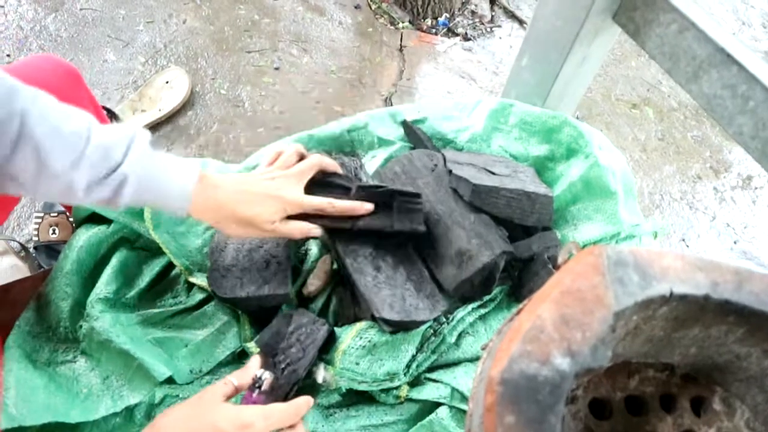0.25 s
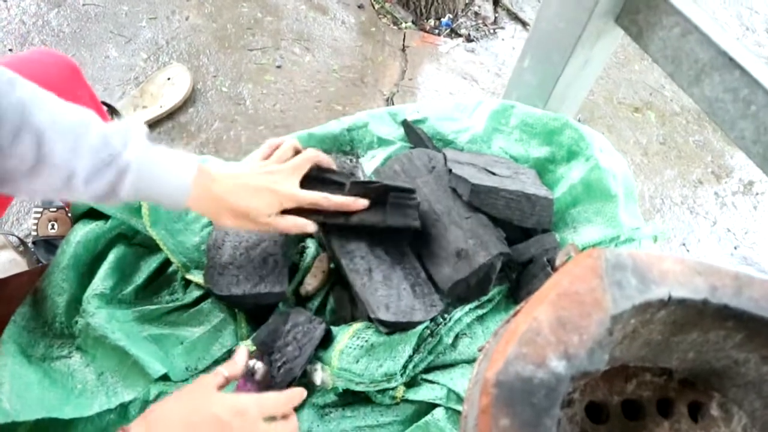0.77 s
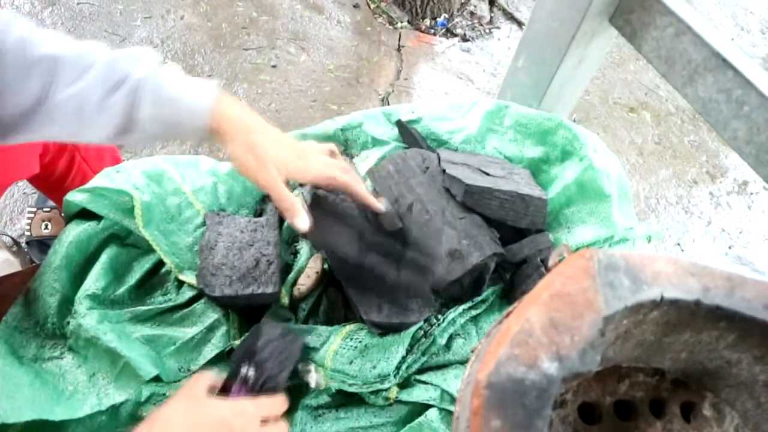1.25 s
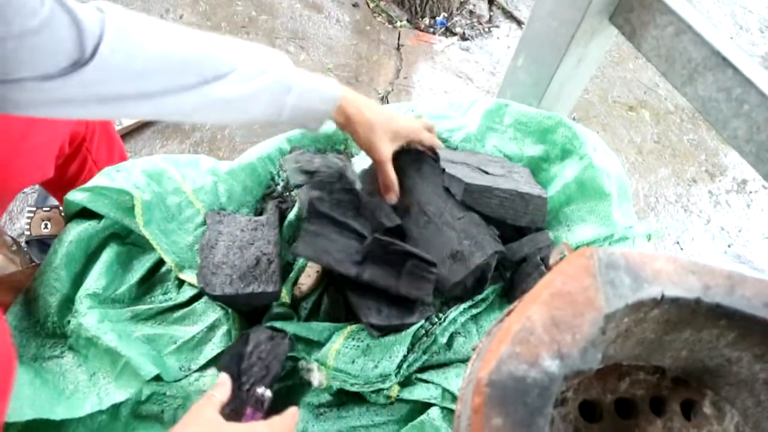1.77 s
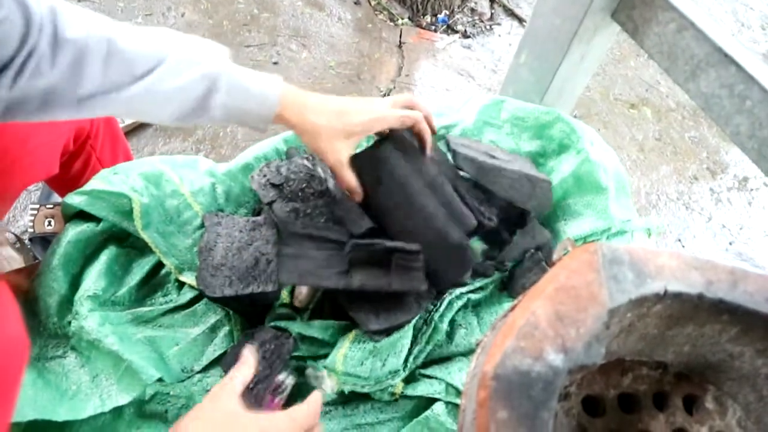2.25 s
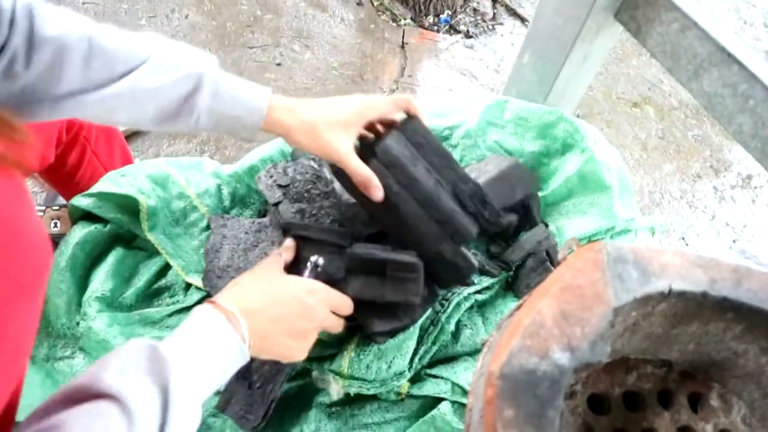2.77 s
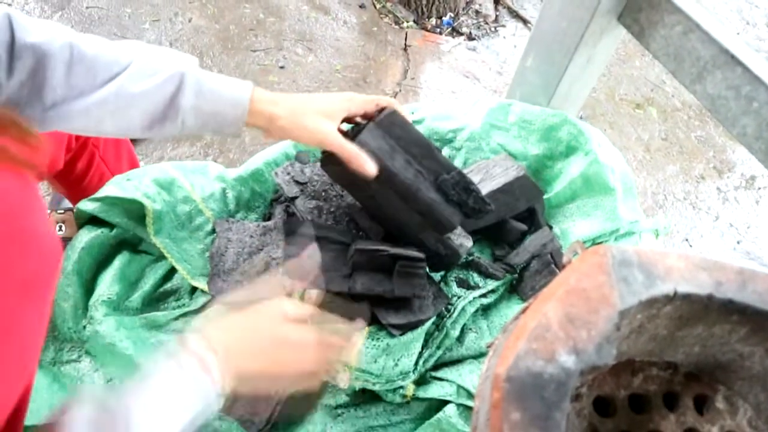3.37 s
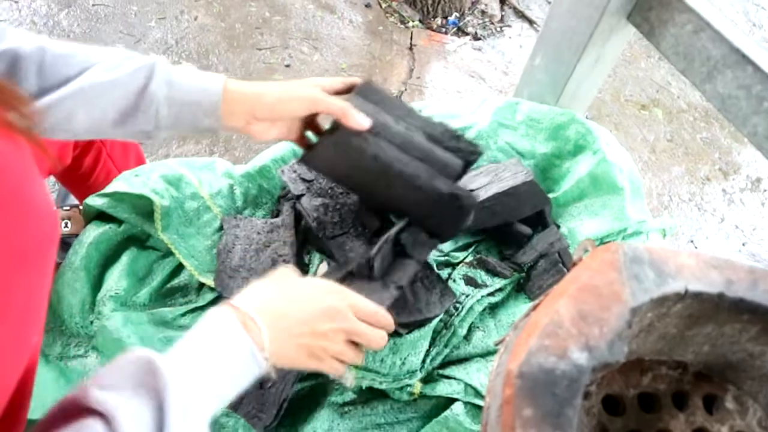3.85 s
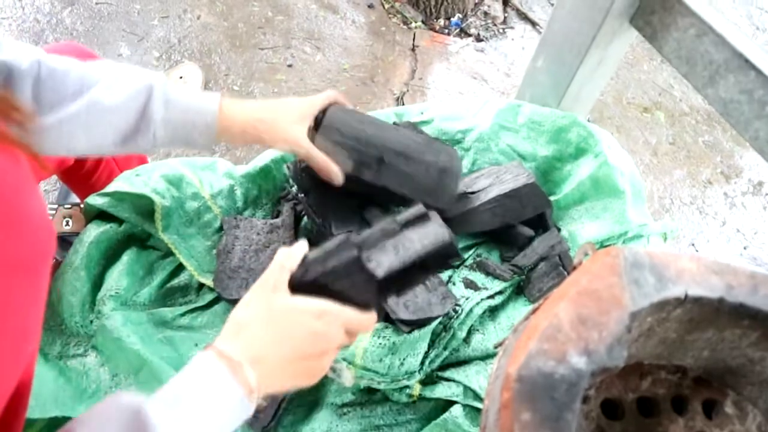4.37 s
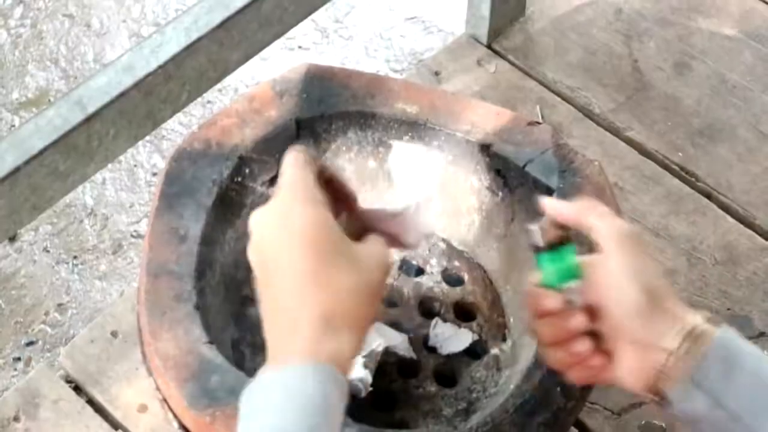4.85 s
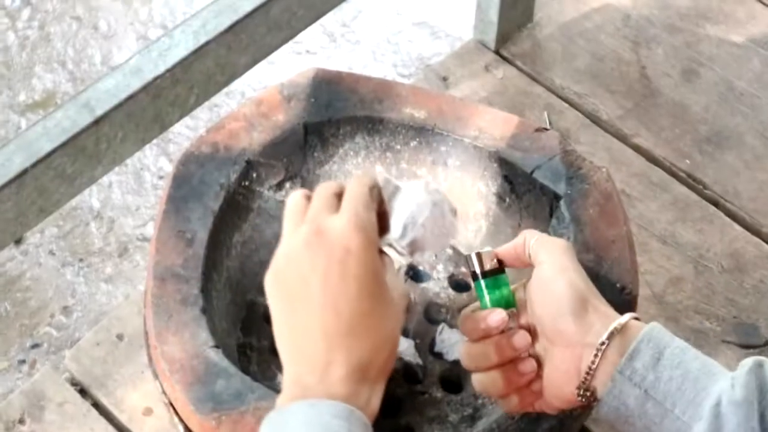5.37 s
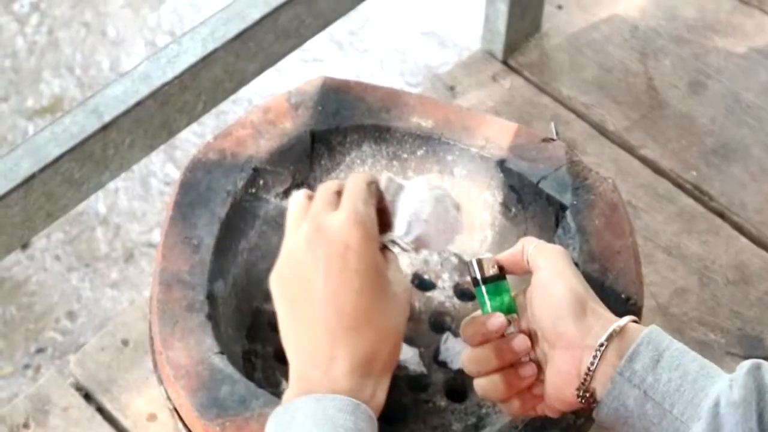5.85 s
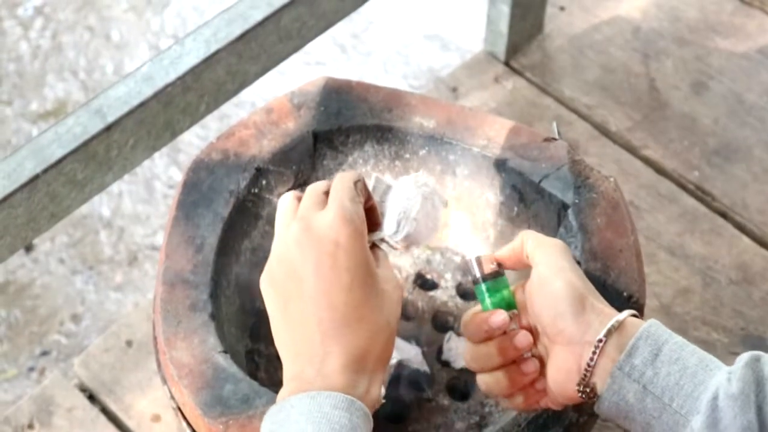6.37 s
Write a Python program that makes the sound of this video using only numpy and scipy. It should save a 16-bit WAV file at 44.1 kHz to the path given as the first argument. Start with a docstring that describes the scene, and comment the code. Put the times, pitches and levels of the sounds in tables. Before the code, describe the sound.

Hard, dry charcoal knocks, gritty dragging and snapping in a plastic sack, a sudden short gap, then three scratchy lighter flicks over low outdoor rumble.

```python
"""Lumps of charcoal are knocked together and picked out of a woven plastic sack on a plank deck.
Each blow excites damped modes of planks, heap and lump; scrapes, snaps and soft swells are noise and clicks.
The sack crinkles by many small ringing folds, and the load rumbles on the deck as steadied low noise.
The level dips briefly; then a flint lighter is flicked three times at a wad of paper, as coloured noise bursts.
Filtered noise makes the low outdoor rumble, wash and thin hiss; echoes and a weak tail form the porch."""
import sys
import numpy as np
from scipy import signal
from scipy.fft import rfft, irfft
from scipy.io import wavfile
from scipy.ndimage import uniform_filter1d

SR = 44100
rng = np.random.default_rng(int(sys.argv[2]) if len(sys.argv) > 2 else 0)


def digitize_waveform(pressure):
    """Quantize a signal to 16-bit integers and store it at the path in sys.argv[1].

    Rows of a 2-D input are taken as channels; values are limited to [-1, 1].
    """
    field = np.atleast_2d(pressure).T
    bounded = np.clip(field, -1, 1)
    quanta = np.round(bounded * 32767).astype(np.int16)
    wavfile.write(sys.argv[1], SR, quanta)


N = 291058
TIME = np.arange(N) / SR
FREQS = np.fft.rfftfreq(N, 1 / SR)

# All spectra below are relative; frequencies between their rows are read on a log axis.
# Distant wash: frequency_hz, density_db (per Hz)
WASH_SPECTRUM = [(22, -25), (55, -19), (95, 8), (140, 2), (330, -5), (650, -6.5), (900, -10), (1400, -14),
                 (2500, -21), (5500, -31), (11500, -39.5), (13500, -39.5), (15500, -67.5)]
# Narrow humps in the wash: centre_hz, width_hz, rise_db
WASH_HUMPS = [(263, 30, 4.5), (447, 34, 4.5), (728, 55, 5.5), (1067, 45, 9.5), (7500, 320, 9)]
# Level of the outdoor background: time_s, level_db
OUTDOOR_LEVEL = [(0, -46), (.35, -53.5), (1.3, -52.5), (3.0, -36.5), (4.7, -38.5), (6.6, -39.5)]
# Wind rumble: frequency_hz, density_db (per Hz)
WIND_SPECTRUM = [(18, -16), (30, -14), (42, -7), (60, 9), (90, -2), (140, -13), (300, -43.5), (1000, -62)]
# The wind's level relative to the background, and one gust near the end
WIND_DB = -10.5
GUST_TOP_S, GUST_RISE_DB, GUST_HALF_S = 6.35, 6.2, 0.67
# Thin high hiss: centre_hz, width_hz, then level_db relative to the background before and after the dip
THIN_HISS = (6580, 191, -29.5, -20)
# Left-right difference of diffuse sound, before an overall offset: frequency_hz, difference_db
DIFFUSE_DIFFERENCE = [(100, -11), (500, -3), (3000, 11.5), (7500, 16.5), (9000, -2.5), (10000, -14)]
# Strokes of the lighter wheel: bite_s, bite_level_db, run_up_s, run_out_s, bite_half_length_s,
# rasp_db (relative to the bite)
FLICKS = [(5.3203, -25, 0.022, 0.027, 0.0029, -8), (5.8181, -33, 0.015, 0.023, 0.0046, -1),
          (6.389, -24, 0.011, 0.025, 0.0048, -8.5)]
# Modes of the lighter's steel wheel and hood: frequency_hz, level_db, t60_s
WHEEL_MODES = [(4270, -4, .012), (7330, 1.5, 0.013), (8030, -3, 0.013)]
# Steel rasping flint: frequency_hz, density_db (per Hz)
FLINT_SPECTRUM = [(500, -17.5), (1800, -10.5), (2600, -10), (3400, -8), (4300, -9.5), (5800, -14),
                  (7500, -10), (9000, -8.5), (11000, -12.5), (13500, -19), (15500, -18)]
# Soft noise swells, a low tail after the second blow, then faint scuffs: middle_s, level_db,
# half_length_s, centre_hz, narrowness_db (per squared octave)
SOFT_SWELLS = [(0.712, -42.5, 0.077, 800, 12), (0.79, -48, 0.093, 595, 13), (2.252, -43, 0.046, 694, 45),
               (4.919, -48, 0.035, 4200, 104), (4.932, -51, .06, 2000, 5.5),
               (5.706, -47.5, 0.024, 1690, 5.5), (5.77, -49.5, 0.033, 1800, 6),
               (5.907, -44, 0.025, 2000, 5.5), (5.981, -45, 0.056, 1760, 5.5)]
# Crinkle of the sack: frequency_hz, density_db (per Hz)
SACK_SPECTRUM = [(200, -18), (600, 1), (1100, -1), (1700, -2.5), (2200, -7.5), (2800, -4), (4000, -7),
                 (5500, -13.5), (7700, -9), (9500, -6), (12000, -9), (14000, -13.5), (15500, -17)]
# Pulls on a big lump in the sack: start_s, end_s, end_tension_db (before the crinkle offset)
PULLS = [(1.738, 3.04, -48), (3.53, 4.675, -47)]
GRIP_S, TIGHTEN_DB_PER_S, RELAX_S = 0.015, 2, 0.55
JOLT_SPREAD = 0.6  # half length of a jolt to the sack, relative to that of the scrape causing it
# Heap dragging on the deck: frequency_hz, density_db (per Hz)
DRAG_SPECTRUM = [(30, -14.5), (60, -6), (90, 5.5), (140, 6.5), (175, -3), (210, -12), (300, -32),
                 (600, -41), (2000, -90)]
# Strength of the drag: time_s, level_db (before the drag offset)
DRAG_EFFORT = [(1.7, -57), (2.15, -44.5), (2.55, -50.5), (2.72, -38.5), (3.05, -34), (3.4, -31),
               (3.53, -34), (3.75, -33), (4.07, -30.5), (4.25, -43.5), (4.33, -29), (4.5, -40), (4.7, -34)]
# Gritty slides of lump over lump: middle_s, level_db, half_length_s, centre_hz, lump_ring_db (relative to grit)
SCRAPES = [(1.58, -51.5, 0.043, 3740, -18), (2.219, -47, 0.056, 2600, -18),
           (2.446, -46.5, 0.041, 5000, -15), (2.516, -41, 0.014, 4960, -27), (3.008, -36, 0.041, 3100, -25),
           (3.664, -39.5, 0.029, 3300, -5), (3.782, -47, 0.042, 4600, -17), (4.112, -40, 0.058, 3070, -7),
           (4.316, -36.5, 0.026, 3800, -3), (4.353, -42.5, .015, 3700, -5), (4.443, -44, 0.016, 3020, -14),
           (4.572, -39, 0.025, 2720, -8), (4.679, -39.5, 0.023, 2880, 3)]
# Grit crushed between two faces: frequency_hz, density_db (per Hz)
GRIT_SPECTRUM = [(250, -23), (700, 10), (1600, 1), (2100, -9), (2700, 1.5), (4400, -6.5), (6000, -6.5),
                 (7800, -4.5), (9500, -13.5), (12000, 3), (15500, -23)]
# Loudest snaps of sack and brittle edges: start_s, level_db (before a common offset), centre_hz, decay_s,
# ping_db (relative to the crack)
SNAPS = [(1.5012, -33, 4410, 0.008, -12), (1.963, -46, 4500, 0.003, -16), (2.1208, -29, 6600, 0.0073, -2),
         (2.1808, -23.5, 3180, 0.025, -8), (2.42, -24.5, 3900, 0.005, -9),
         (2.431, -23.5, 4940, 0.0065, -17), (2.498, -32, 2480, 0.003, -12),
         (2.5364, -22.5, 3900, 0.0044, -21), (2.585, -26.5, 7400, 0.0063, -3),
         (2.705, -29, 2370, 0.0018, -8), (2.7468, -26, 3650, 0.0067, -11), (2.801, -28.5, 4000, 0.013, -16),
         (2.875, -20.5, 3130, 0.0094, -16), (2.928, -33, 7130, 0.0016, -4), (2.9497, -27, 3400, .004, -15),
         (2.978, -26.5, 3650, 0.0035, -17), (3.0094, -23, 4460, 0.0034, -6),
         (3.025, -20.5, 2280, 0.002, -15), (3.067, -22.5, 6900, 0.0049, -5),
         (3.539, -27, 4430, 0.0043, -10.5), (3.5823, -29, 4960, 0.0084, -14),
         (3.684, -23, 2960, 0.0087, -9), (3.9583, -20.5, 2800, 0.0096, -20), (4.097, -23, 3640, 0.006, 2.5),
         (4.141, -25.5, 4500, 0.0067, -8), (4.219, -24.5, 2200, 0.0031, -18),
         (4.2638, -16.5, 3900, 0.0042, 3), (4.2933, -22.5, 3440, 0.0022, -18),
         (4.312, -23, 3700, 0.0059, -1.5), (4.4649, -14, 4300, 0.004, -14), (4.559, -27, 2600, 0.0023, -10),
         (4.6872, -33, 2850, .003, 8), (4.693, -33, 2860, 0.003, 8)]
# Blows: start_s, thump_db, knock_db, clink_db, knock_centre_hz, knock_top_hz, settling_s,
# roughness (ratio), plank_pitch_hz, heap_pitch_hz, lump_pitch_hz
KNOCKS = [(0.1431, -19.5, -12.5, -7, 1137, 3500, 0.0024, 0.57, 174, 1081, 3150),
          (0.6358, -31, -19.5, -26.5, 812, 3000, 0.0032, 0.9, 179, 927, 3320),
          (0.6369, -16, -12.5, -44, 280, 776, 0.0049, 0.3, 173.6, 903, 2720),
          (0.64, -20.5, -13, -24, 862, 2970, 0.005, 1, 217.4, 914, 3170),
          (1.2991, -35, -20, -30.5, 1080, 3430, 0.0056, 0.42, 150, 965, 3610),
          (1.6446, -19, -23.5, -67, 520, 1260, 0.026, 0.83, 191, 893, 3180),
          (1.7711, -55, -30.5, -45.5, 760, 1670, 0.011, 0.64, 174, 920, 2980),
          (2.2221, -49, -32.5, -46.5, 684, 1900, 0.0043, 0.3, 180, 680, 2700),
          (2.3121, -52, -39, -43, 750, 2200, 0.0055, 0.7, 170, 674, 2490),
          (2.436, -24, -39.5, -55, 400, 1200, 0.0065, 0.85, 135.5, 960, 3100),
          (2.4827, -40, -37, -41.5, 1100, 2600, 0.0036, 0.76, 159, 935, 1980),
          (2.503, -30, -37.5, -49, 700, 2400, 0.0038, 0.5, 152, 1090, 2500),
          (2.861, -35, -27.5, -35, 1020, 3000, 0.0056, 0.5, 144, 1000, 2420),
          (3.172, -40, -21, -31, 380, 1100, 0.0029, 0.34, 174, 1184, 3180),
          (3.1857, -53, -27.5, -40, 520, 1210, 0.014, 0.9, 174, 886, 2860),
          (3.2469, -32.5, -25.5, -62, 850, 1710, 0.018, 0.77, 190, 1300, 2400),
          (3.2836, -40.5, -18, -39, 700, 2030, 0.019, 0.73, 185, 1270, 2300),
          (3.3555, -40, -27, -48, 800, 2010, 0.015, 0.8, 188, 1300, 2280),
          (3.654, -20, -27, -32.5, 460, 1400, 0.0075, 0.6, 152, 770, 3240),
          (3.8974, -44, -31, -33.5, 1250, 3000, 0.0067, 1.2, 144, 1480, 3230),
          (3.91, -31, -38, -43, 500, 1500, 0.0034, .7, 141.5, 960, 3000),
          (4.005, -21.5, -32, -57, 388, 1210, 0.0045, 0.5, 125.4, 906, 2900),
          (4.1149, -50, -29, -33, 920, 2370, 0.0085, .7, 140, 1020, 2920),
          (4.4573, -30, -25.5, -30.5, 636, 2360, 0.003, 0.9, 141, 790, 4800),
          (4.5871, -31, -31.5, -31, 1070, 3000, 0.0079, 0.8, 142, 1080, 3130)]
# In the next three tables each blow shifts the modes together to its own pitch.
# Deck under the sack: frequency_hz, level_db, t60_s
PLANK_MODES = [(140, -21, 0.88), (174.6, 3.5, 0.14), (206, -6, 0.16)]
# Strongest modes of the heap of heavy lumps: frequency_hz, level_db, t60_s
HEAP_MODES = [(289.7, -1.5, 0.069), (375, -2.5, 0.029), (596.7, -3.5, 0.019), (810, -5.5, 0.013),
              (925, -3, 0.04), (1044, 5, 0.032), (1370, -10.5, .02), (1580, -13.5, 0.0094),
              (1815, 0.5, 0.025)]
# Strongest bright modes of a single lump: frequency_hz, level_db, t60_s
LUMP_MODES = [(1810, -11, .025), (2480, -10, .018), (2690, -6, .02), (3040, -3, .015), (3220, 5.5, .014),
              (3360, -1, .014), (3950, -12, .02), (5380, -18, .02), (7750, -12.5, .02)]
# The heap's many weaker, crowded modes: frequency_hz, density_db (per Hz)
HEAP_DENSE = [(50, -60), (110, -32.5), (250, -2), (400, -3), (600, -3), (1100, -7.5), (1450, -6.5),
              (1800, -1), (2300, -9), (4000, -15.5), (9000, -33)]
# A lump's crowded modes and crumbling grit: frequency_hz, density_db (per Hz)
LUMP_DENSE = [(600, -29.5), (1600, -5), (2200, -8.5), (3200, 4), (4200, -5.5), (6200, -11.5), (7800, -10),
              (9200, -15), (11500, -15.5), (15500, -25.5)]
# Decay of the porch: frequency_hz, t60_s
PORCH_DECAY = [(150, 0.16), (380, 0.48), (600, .3), (1050, 0.13), (2000, 0.18), (3000, 0.18), (8000, 0.18),
               (14000, 0.17)]
# Colour of the porch's answer: frequency_hz, level_db
PORCH_COLOUR = [(150, -0.5), (500, 2.5), (800, -3), (1200, 2), (2200, 0.5), (3300, -5), (5200, 0.5),
                (9000, 2)]
# Early echoes: delay_s, level_db
ECHOES = [(.0058, -19.5), (0.0227, -20)]
# Two microphone ports: frequency_hz, left_lead_rad
PORT_PHASE = [(20, 0), (200, .03), (500, .15), (2700, .08), (4200, .5), (6300, .6), (7900, .45),
              (8500, 1.2), (9100, 2.7), (9900, np.pi)]
# The same ports: frequency_hz, left_minus_right_db
PORT_BALANCE = [(100, -.2), (250, .2), (500, 1.2), (1000, 2.4), (2000, .4), (4000, .7), (8000, -.3),
                (9900, 0)]
# Brief dip in level: start_s, end_s
DIP = (4.712, 4.741)
EDGE_HZ = 16000  # upper band limit


def amp(db):
    """Decibels as an amplitude ratio."""
    return 10 ** (np.asarray(db) / 20)


def unit(x):
    """Normalises a signal to rms 1."""
    return x / np.sqrt(np.mean(x ** 2) + 1e-20)


def burst(x):
    """Normalises a short sound to the energy of 10 ms at rms 1."""
    return x / np.sqrt(np.sum(x ** 2) / (SR / 100) + 1e-20)


def read(points, hz):
    """Interpolates a spectrum on a log-frequency axis."""
    f, value = np.transpose(points)
    return np.interp(np.log(hz + 1), np.log(f + 1), value)


def level(curve):
    """Gain at every sample, interpolated in decibels from rows of time and level."""
    return amp(np.interp(TIME, *np.transpose(curve)))


def colour(x, spectrum):
    """Linear filtering: multiplies the spectrum of a signal by a gain curve."""
    gain = amp(read(spectrum, np.fft.rfftfreq(len(x), 1 / SR)))
    return irfft(rfft(x) * gain, len(x))


def bell_noise(hz, width):
    """Noise whose amplitude spectrum is a Gaussian bell about one frequency."""
    bell = np.exp(-((FREQS - hz) / width) ** 2)
    return unit(irfft(rfft(rng.standard_normal(N)) * bell, N))


def wander(rate_hz, size):
    """Random fluctuation of rms 1, by straight lines between chance values drawn at a given rate."""
    knots = rng.standard_normal(size)
    return unit(np.interp(np.arange(size) * rate_hz / SR, np.arange(size), knots))


def steadied(x, span_s=0.029):
    """Divides a noise by its own short-time rms, which evens out its chance swells."""
    power = uniform_filter1d(x ** 2, max(round(span_s * SR), 1))
    return unit(x / np.sqrt(abs(power) + 1e-12))


def swell(s, half):
    """A Gaussian rise and fall, 1 at time s."""
    return np.exp(-((TIME - s) / half) ** 2)


def add(mix, s, sound):
    """Superposition: adds a sound to the mix in place at time s."""
    part = mix[max(round(s * SR), 0):][:len(sound)]
    part += sound[:len(part)]


def ring(modes, t):
    """Impulse response of a resonant body: exponentially damped sine modes set off together."""
    return sum(amp(db - 60 * t / t60) * np.sin(2 * np.pi * hz * t) for hz, db, t60 in modes)


def sized(modes, hz):
    """Similarity of size: scales all mode frequencies so that the strongest lies at hz."""
    main = max(modes, key=lambda mode: mode[1])[0]
    return [(f * hz / main, db, t60) for f, db, t60 in modes]


def lean(rows, centre_hz, below_db, above_db, most_db=45):
    """Weights spectral rows towards a centre, losing decibels per squared octave up to a limit."""
    leaned = []
    for f, db, *rest in rows:
        slope_db = above_db if f > centre_hz else below_db
        loss_db = min(slope_db * np.log2(f / centre_hz) ** 2, most_db)
        leaned.append((f, db - loss_db, *rest))
    return leaned


def crowd(spectrum, t, decay, rise, spiky=0):
    """High modal density: overlapping damped modes act as a dying burst of coloured noise."""
    noise = rng.standard_normal(len(t))
    coloured = colour(noise * abs(noise) ** spiky, spectrum)
    return burst(coloured * np.exp(-t / decay) * (1 - np.exp(-t / rise)))


def grains(per_s, size_db, size):
    """Random impulses at a mean rate, of either sign and exponentially distributed decibel size."""
    struck = rng.random(size) < per_s / SR
    sign = rng.choice([-1, 1], size)
    return struck * sign * amp(size_db * np.minimum(rng.exponential(1, size), 4.5))


def outdoors(apart_db=-17, waver_db=1, gust_db=2):
    """Broadband noise: a wash with steady humps, nearly alike at both ports, and a gusting wind rumble."""
    shape_db = read(WASH_SPECTRUM, FREQS)
    for hz, width, db in WASH_HUMPS:
        shape_db = shape_db + db * np.exp(-((FREQS - hz) / width) ** 2)
    common, apart = (unit(irfft(rfft(rng.standard_normal(N)) * amp(shape_db), N)) for _ in range(2))
    apart = amp(apart_db) * colour(apart, DIFFUSE_DIFFERENCE)
    wash = amp(waver_db * wander(13, N)) * np.array([common + apart, common - apart])
    wind_db = WIND_DB + GUST_RISE_DB * swell(GUST_TOP_S, GUST_HALF_S) + gust_db * wander(11, N)
    wind = unit(colour(rng.standard_normal(N), WIND_SPECTRUM)) * amp(wind_db)
    return level(OUTDOOR_LEVEL) * (wash + wind)


def thin_hiss():
    """Narrow-band noise: a high hiss that stands out once the dip begins."""
    hz, width, before_db, after_db = THIN_HISS
    share = amp(np.where(TIME < DIP[0], before_db, after_db))
    return bell_noise(hz, width) * level(OUTDOOR_LEVEL) * share


def lighter(teeth_hz=450, tooth_db=4, bite_hz=3700, bite_focus_db=7, rasp_hz=6500, rasp_focus_db=2, wheel_db=-1):
    """Frictional excitation: a toothed wheel rasps brightly, bites flint with a lower snap and runs out."""
    out, t = np.zeros(N), np.arange(-SR // 20, SR // 6) / SR
    rasp_spectrum = lean(FLINT_SPECTRUM, rasp_hz, rasp_focus_db, rasp_focus_db)
    bite_spectrum = lean(FLINT_SPECTRUM, bite_hz, bite_focus_db, bite_focus_db)
    for s, db, run_up, run_out, bite, rasp_db in FLICKS:
        turning = np.exp(-(t / np.where(t < 0, run_up, run_out)) ** 2)
        # each tooth catches with its own force
        teeth = amp(tooth_db * np.tanh(wander(teeth_hz, len(t))))
        rasp = unit(colour(teeth * rng.standard_normal(len(t)), rasp_spectrum))
        wheel = unit(signal.fftconvolve(rasp, ring(WHEEL_MODES, t[t >= 0]))[:len(t)])
        rasp = unit(rasp + amp(wheel_db) * wheel)
        snap = unit(colour(rng.standard_normal(len(t)), bite_spectrum)) * np.exp(-(t / bite) ** 2)
        add(out, s + t[0], amp(db) * (snap + amp(rasp_db) * turning * rasp))
    return out


def soft_swells(per_s=900, size_db=2, clump_db=0.0, clump_rate=120):
    """Filtered impulse noise: random clicks through a bell-shaped band give a grainy swell that fades."""
    out, t = np.zeros(N), np.arange(-SR // 5, SR // 5) / SR
    freqs = np.fft.rfftfreq(len(t), 1 / SR)
    for s, db, half, hz, focus_db in SOFT_SWELLS:
        clicks = grains(per_s, size_db, len(t)) * amp(clump_db * wander(clump_rate, len(t)))
        band = amp(-focus_db * np.log2((freqs + 1) / hz) ** 2)
        noise = unit(irfft(rfft(clicks) * band, len(t)))
        add(out, s + t[0], amp(db) * noise * np.exp(-(t / half) ** 2))
    return out


def pulling():
    """Tension on the sack: each pull grips quickly, tightens steadily and relaxes exponentially."""
    tension = 0
    for start, end, db in PULLS:
        tightening = amp(db + TIGHTEN_DB_PER_S * np.minimum(TIME - end, 0))
        grip = np.clip((TIME - start) / GRIP_S, 0, 1)
        relaxing = np.exp(-np.maximum(TIME - end, 0) / RELAX_S)
        tension = tension + tightening * grip * relaxing
    return tension


def crumbs(per_s=28):
    """Brittle fracture: crumbs crack under load in uneven bunches, in colours from dull to bright."""
    out, t = np.zeros(N), np.arange(SR // 60) / SR
    for hz in np.geomspace(1200, 8000, num=20):
        tick = crowd(lean(GRIT_SPECTRUM, hz, 60, 60), t, 0.0035, 0.0003)
        cracks = grains(per_s, 1.5, N) * amp(7 * np.tanh(wander(20, N)))
        out += signal.oaconvolve(cracks, tick)[:N]
    return unit(out)


def sack(crinkle_db=-2.0, drag_db=-1, per_s=170, size_db=2.0, clump_db=1.0, clump_rate=90,
         fold_db=3.0, fold_rate=35, fold_t60=0.016, jolt_crinkle_db=-11):
    """Buckling: stiff tapes click in clumps and ring as folds, crumbs crack, and the load drags on the planks."""
    folds, t = np.zeros(N), np.arange(SR // 50) / SR
    for hz in np.linspace(450, 13000, num=36):
        clicks = grains(per_s, size_db, N) * amp(fold_db * wander(fold_rate, N))
        folds += unit(signal.oaconvolve(clicks, ring([(hz, 0, fold_t60)], t))[:N])
    crinkle = unit(colour(folds, SACK_SPECTRUM) * amp(clump_db * wander(clump_rate, N)))
    crinkle = amp(-2.5) * crinkle + amp(-1) * crumbs()
    drag = steadied(colour(rng.standard_normal(N), DRAG_SPECTRUM))
    # every scrape of the lumps also jolts the sack
    jolts = sum(amp(db + jolt_crinkle_db) * swell(s, JOLT_SPREAD * half) for s, db, half, *_ in SCRAPES)
    tension = amp(crinkle_db) * pulling() + jolts
    gripped = np.clip((TIME - PULLS[0][0]) / GRIP_S, 0, 1)
    handled = np.interp(TIME, DIP, [1, 0])  # the sack falls silent during the dip
    return handled * (tension * crinkle + gripped * amp(drag_db) * level(DRAG_EFFORT) * drag)


def scrapes(per_s=1100, size_db=-0.5, focus_db=2, slip_rate=220):
    """Stick-slip: grit catches in crisp clusters under a sliding lump and excites its modes."""
    out, t = np.zeros(N), np.arange(-SR // 8, SR // 8) / SR
    for s, db, half, hz, ring_db in SCRAPES:
        slips = amp(4 * np.tanh(wander(slip_rate, len(t))))
        catches = grains(per_s, size_db, len(t)) * slips
        grit = unit(colour(catches, lean(GRIT_SPECTRUM, hz, focus_db, focus_db)))
        body = unit(signal.fftconvolve(catches, ring(sized(LUMP_MODES, hz), t[t >= 0]))[:len(t)])
        slide = unit(grit + amp(ring_db) * body)
        add(out, s + t[0], amp(db) * slide * np.exp(-(t / half) ** 2))
    return out


def snaps(gain_db=-16.0, focus_db=3.5, ping_t60=0.01):
    """Fracture: a dry crack is a spray of tiny breaks, and the broken piece pings as one damped mode."""
    out, t = np.zeros(N), np.arange(SR // 20) / SR
    for s, db, hz, decay, ping_db in SNAPS:
        crack = crowd(lean(SACK_SPECTRUM, hz, focus_db, focus_db), t, decay, 0.00056, spiky=0.51)
        ping = burst(ring([(hz, 0, ping_t60)], t))
        add(out, s, amp(db + gain_db) * (crack + amp(ping_db) * ping))
    return out


def chatter(t, decay, grit):
    """Contact force: one firm impulse, then a dying spray of tiny ones as rough faces settle."""
    spray = rng.standard_normal(len(t)) ** 3 * np.exp(-t / decay)
    force = grit * spray / np.linalg.norm(spray)
    force[0] += 1
    return force


def knocks(grit=1.0, clink_grit=0.75, clink_share=0.99, below_db=4, above_db=9, thump_rise=0.006,
           heap_dense_db=0, lump_dense_db=1):
    """Modal impact: each blow sets planks, heap and lump ringing, and rough contacts smear the modes."""
    out, t = np.zeros(N), np.arange(SR // 3) / SR
    for (s, thump_db, knock_db, clink_db, hz, top_hz, settle, rough,
         plank_hz, heap_hz, lump_hz) in KNOCKS:
        # soft contacts on big lumps favour the low modes, hard ones the high
        heap_modes = lean(sized(HEAP_MODES, heap_hz), hz, below_db, above_db)
        heap_force = chatter(t, settle, grit * rough)
        heap = burst(signal.fftconvolve(ring(heap_modes, t), heap_force)[:len(t)])
        heap_dense = crowd(lean(HEAP_DENSE, hz, below_db, above_db), t, settle, 0.5 / hz)
        heap += rough * amp(heap_dense_db) * heap_dense
        heap = signal.sosfilt(signal.butter(4, min(top_hz, SR / 3), fs=SR, output="sos"), heap)

        lump_settle = settle * clink_share
        lump_force = chatter(t, lump_settle, clink_grit * rough)
        lump = burst(signal.fftconvolve(ring(sized(LUMP_MODES, lump_hz), t), lump_force)[:len(t)])
        lump += amp(lump_dense_db) * crowd(LUMP_DENSE, t, lump_settle, 0.00032)

        thump = ring(sized(PLANK_MODES, plank_hz), t) * (1 - np.exp(-t / thump_rise))
        blow = amp(thump_db) * burst(thump) + amp(knock_db) * burst(heap) + amp(clink_db) * burst(lump)
        add(out, s, blow)
    return out


def porch(x, wet_db=-14, apart_db=-8, rise=0.0011):
    """Reverberation: a few close echoes and a weak tail in which each band decays at its own rate."""
    hz, t, z = signal.stft(rng.standard_normal((2, SR)), SR, nperseg=256)
    decay_db = read(PORCH_COLOUR, hz)[:, None] - 60 * t / read(PORCH_DECAY, hz)[:, None]
    tails = signal.istft(z * amp(decay_db), SR, nperseg=256)[1]
    tails *= 1 - np.exp(-np.arange(tails.shape[1]) / SR / rise)
    common, apart = amp(wet_db) * tails / np.linalg.norm(tails[0])
    apart = amp(apart_db) * colour(apart, DIFFUSE_DIFFERENCE)
    common[0] += 1  # direct sound
    for s, db in ECHOES:
        common[round(s * SR)] += amp(db)
    responses = np.array([common + apart, common - apart])
    return signal.fftconvolve(x[None], responses, axes=1)[:, :N]


def scene(blow_cut_hz=85):
    """Superposition of all handling sounds on the porch with the open air."""
    # the blows carry no deep bass
    bass_cut = signal.butter(4, blow_cut_hz, "highpass", fs=SR, output="sos")
    blows = signal.sosfilt(bass_cut, knocks())
    near_sounds = blows + snaps() + scrapes() + sack() + soft_swells() + lighter()
    return porch(near_sounds) + outdoors() + thin_hiss()


def record(dry, dip_db=-28):
    """Two close ports, opposed in phase in the top treble; then a brief dip, clipping and a band limit."""
    side = np.array([[.5], [-.5]])  # left and right each take half of the difference
    ports = amp(side * read(PORT_BALANCE, FREQS)) * np.exp(1j * side * read(PORT_PHASE, FREQS))
    heard = irfft(rfft(dry) * ports, N)
    dip = np.where((TIME > DIP[0]) & (TIME < DIP[1]), amp(dip_db), 1.)
    heard = heard * uniform_filter1d(dip, size=90)
    low_pass = signal.firwin(511, EDGE_HZ, window=("kaiser", 9), fs=SR)
    return signal.oaconvolve(np.clip(heard, -1, 1), low_pass[None], "same")


dry = scene()
out = record(dry)
digitize_waveform(out)
```